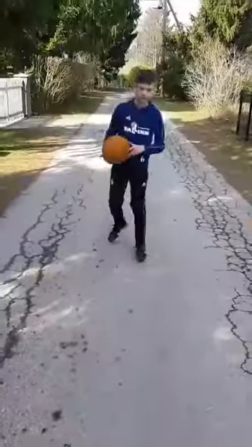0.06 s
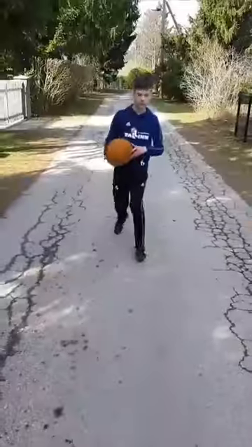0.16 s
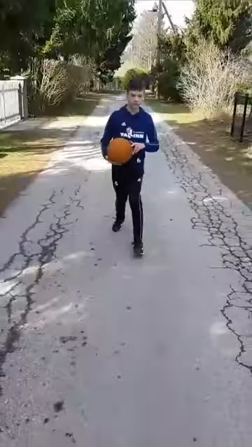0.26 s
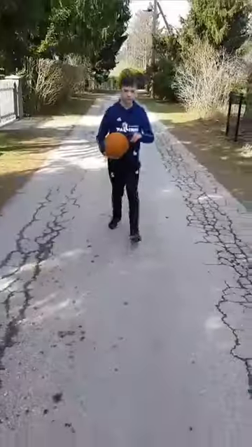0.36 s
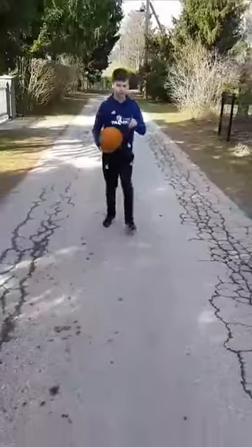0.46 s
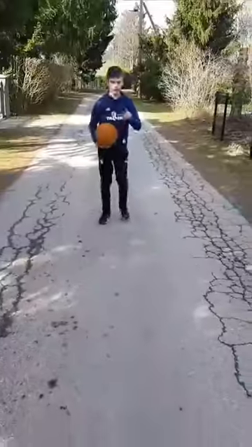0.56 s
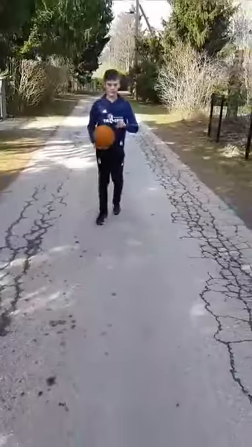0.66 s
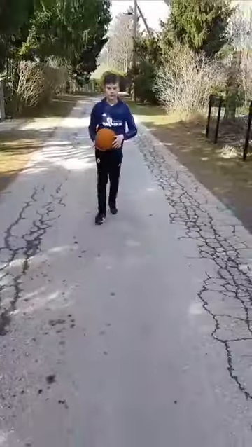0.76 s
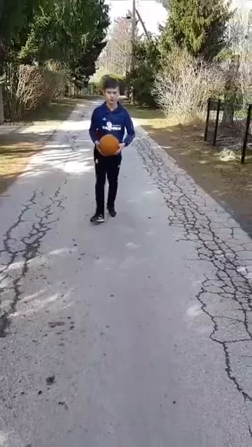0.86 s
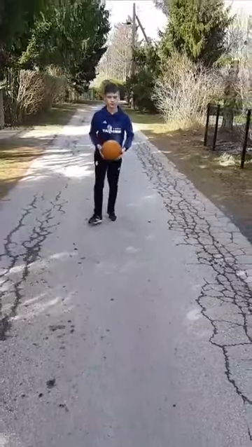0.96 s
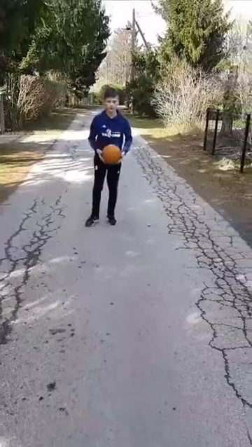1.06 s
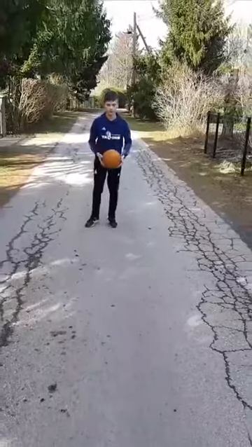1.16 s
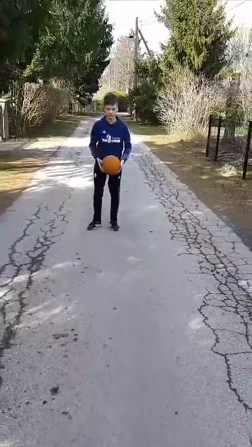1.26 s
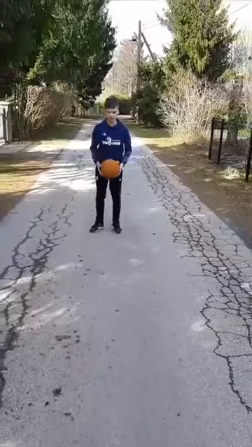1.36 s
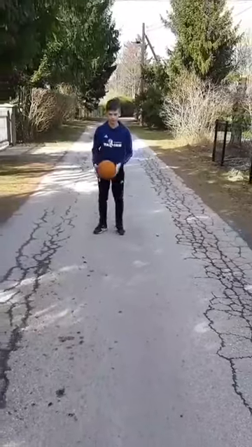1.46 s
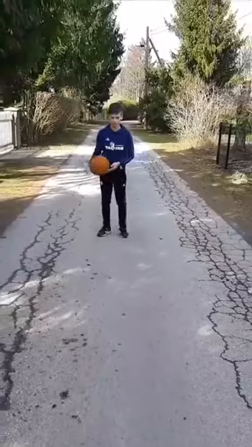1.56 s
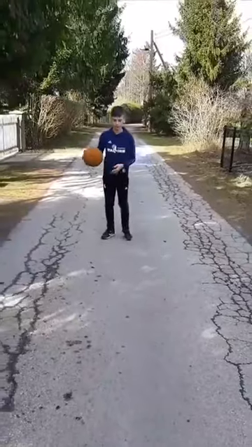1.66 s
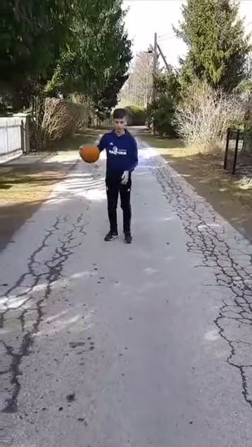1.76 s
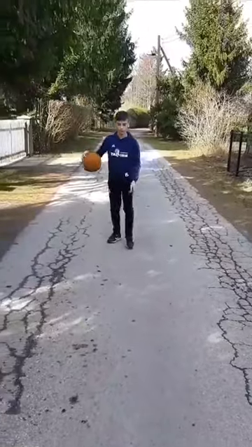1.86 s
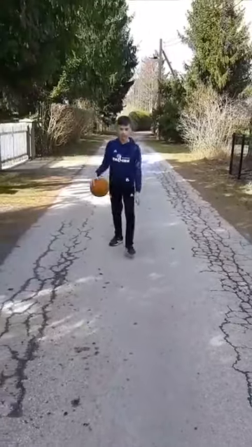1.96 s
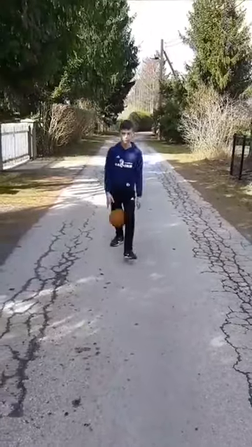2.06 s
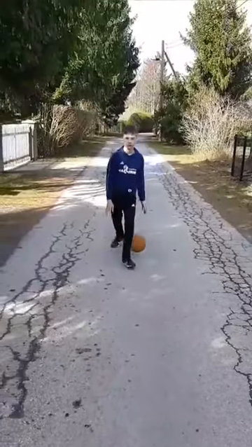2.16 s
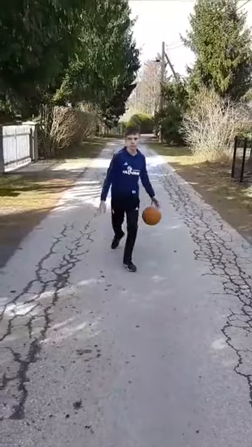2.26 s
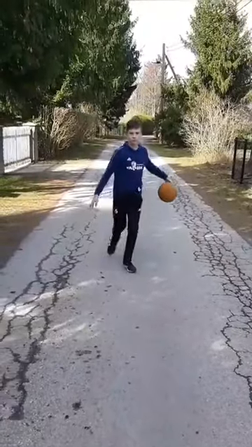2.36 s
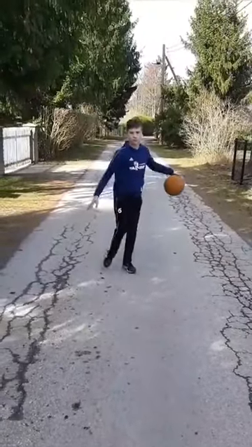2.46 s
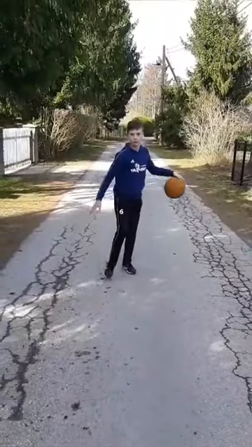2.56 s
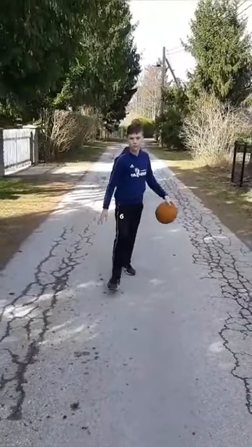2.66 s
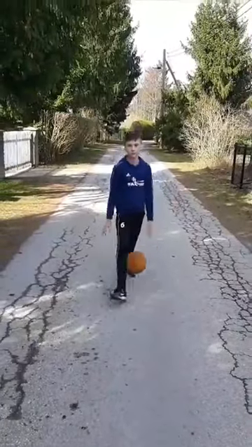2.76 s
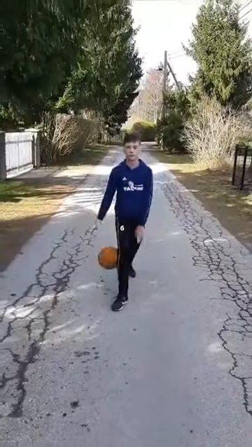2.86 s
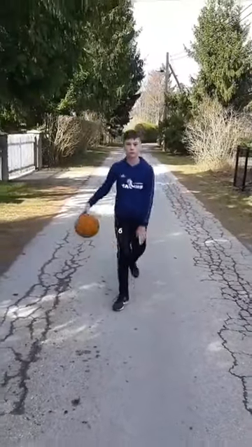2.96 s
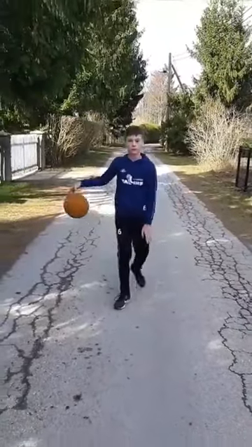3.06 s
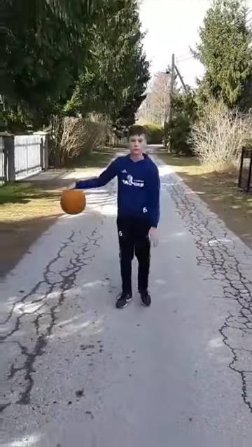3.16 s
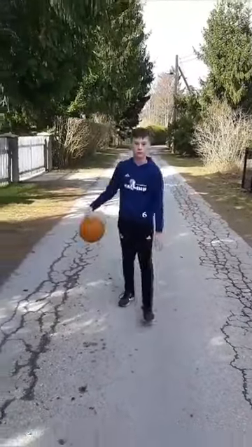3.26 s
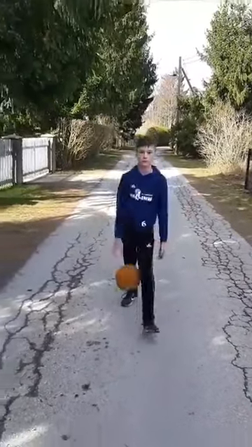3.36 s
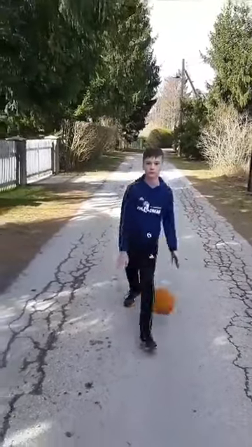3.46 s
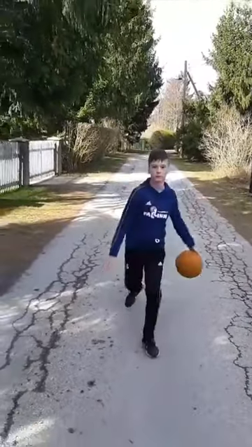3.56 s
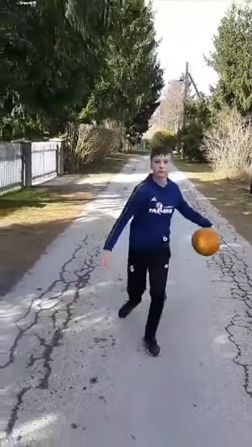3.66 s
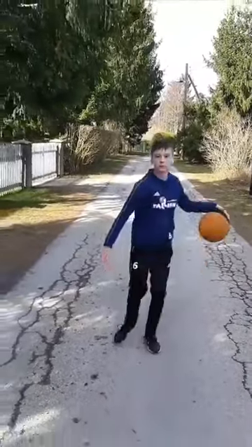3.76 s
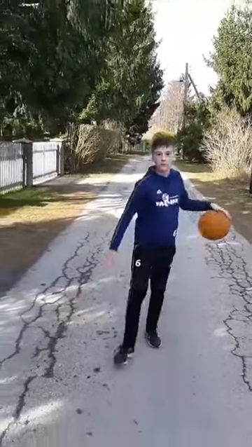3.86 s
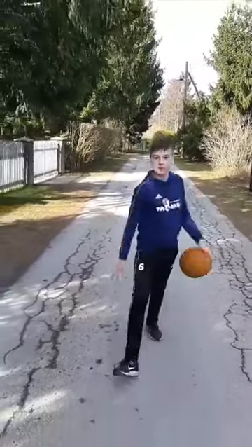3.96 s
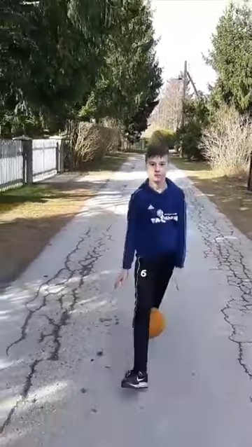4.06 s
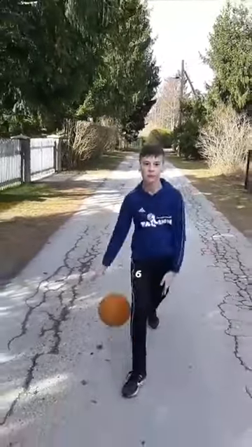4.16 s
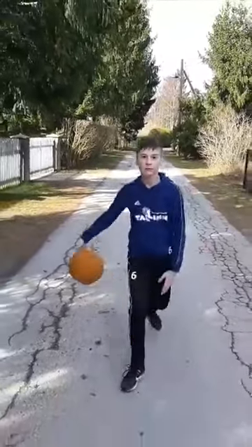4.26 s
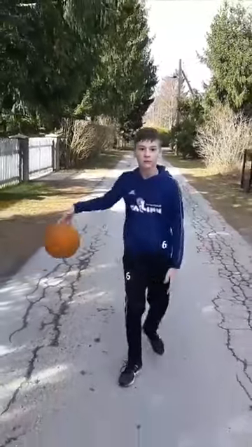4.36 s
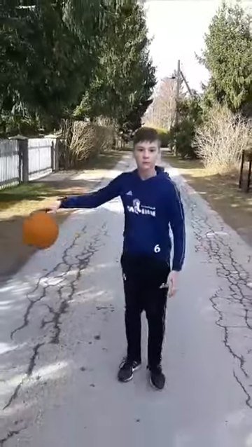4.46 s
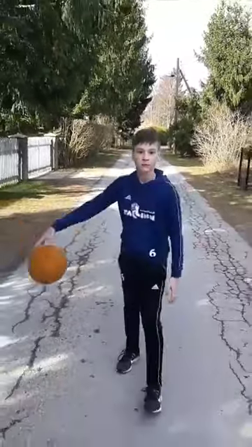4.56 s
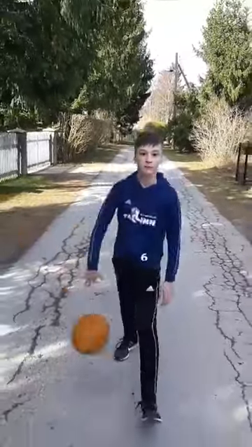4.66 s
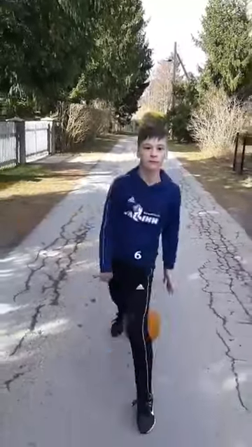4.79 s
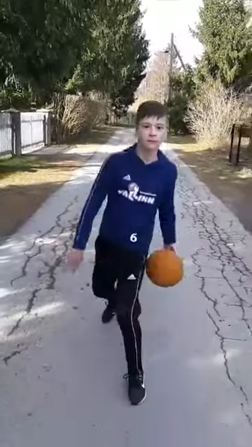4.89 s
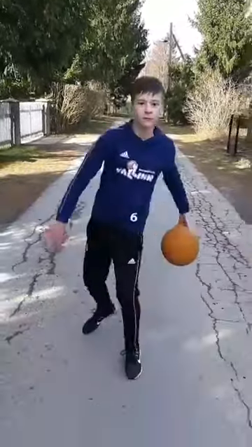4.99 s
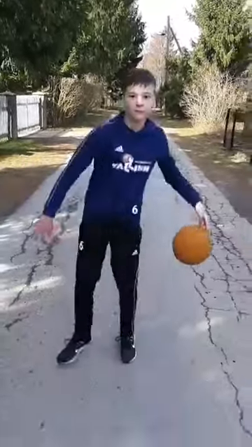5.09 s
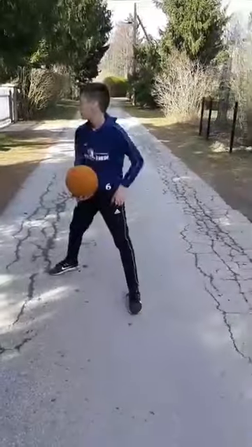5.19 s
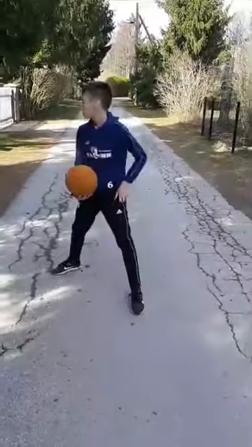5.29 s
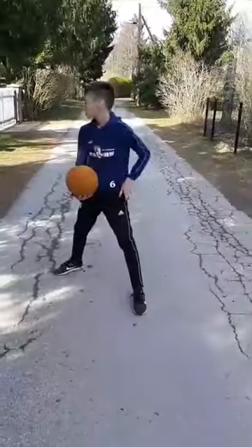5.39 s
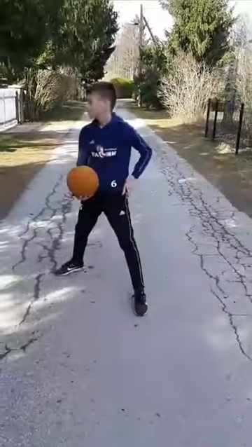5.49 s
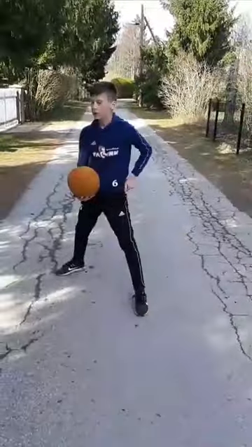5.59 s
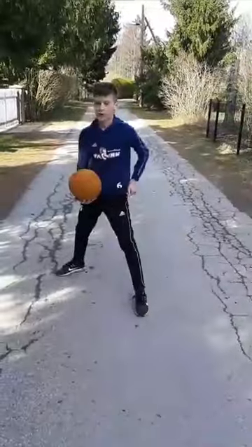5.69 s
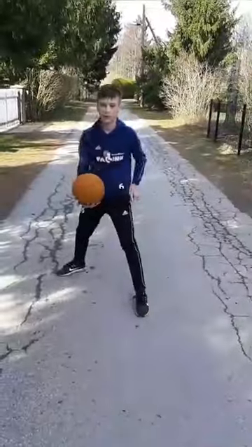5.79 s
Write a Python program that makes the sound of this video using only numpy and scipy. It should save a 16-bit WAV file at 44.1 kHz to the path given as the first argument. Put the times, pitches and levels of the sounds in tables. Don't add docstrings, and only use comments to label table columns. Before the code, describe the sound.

A quiet open-air lane with soft distant traffic, leaf hiss and low wind bumps on a handheld stereo microphone in the first second. Gritty shoe scuffs and tiny cracks come at about 0.2-0.4, 0.75 and 1.15 s. A songbird alternates a clean high falling note with a lower buzzy rising one until about 2.2 s, while thin whistles flicker above and a far fluting bird answers. A basketball hits asphalt softly and far off at 2.2 s, then hard at 2.9, moderately at 3.5, hard and duller at 4.15, and with a heavy thud at 4.8 s, each with short echoes and a diffuse tail. Foot taps and grit clicks fall between, clustering near 3.6 and 4.9 s. A distant crow caws long at 3.1, briefly at 4.6 and again at 5.2 s. The songbird returns around 3.7-4.3 s, then faintly. After 5 s no bounces follow; wind thumps and rumbles to the end.

```python
import sys
import numpy as np
from scipy import signal
from scipy.fft import rfft, irfft
from scipy.io import wavfile
from scipy.ndimage import uniform_filter1d

SR = 44100
rng = np.random.default_rng(int(sys.argv[2]) if len(sys.argv) > 2 else 0)


def ratio(d):
    e = np.asarray(d, float) / 20
    return 10 ** e


def transcribe(u):
    v = np.clip(np.atleast_2d(u).T, -1, 1)
    q = np.round(v * 32767).astype(np.int16)
    wavfile.write(sys.argv[1], SR, q)


N = 257103
TIME = np.arange(N) / SR


def rms_one(x):
    return x / np.sqrt(np.mean(x ** 2) + 1e-20)


def at_hz(points, hz):
    table = np.array(points)
    return np.interp(np.log(hz), np.log(np.maximum(table[:, 0], 1)), table[:, 1])


def band(x, low_hz, high_hz, order=2):
    edges_hz = [low_hz, min(high_hz, .45 * SR)]
    return signal.sosfilt(signal.butter(order, edges_hz, "band", fs=SR, output="sos"), x)


def ring(x, hz, t60):
    radius, angle = ratio(-60 / (t60 * SR)), 2 * np.pi * hz / SR
    return signal.lfilter([0, np.sin(angle)], [1, -2 * radius * np.cos(angle), radius ** 2], x + 1e-18)


def drift(rate):
    r = np.exp(-2 * np.pi * rate / SR)
    settled = signal.lfilter([1], [1, -2 * r, r * r], rng.standard_normal(N + SR))[SR:]
    return rms_one(settled)


def coloured(x, spectrum):
    hz = np.maximum(np.fft.rfftfreq(N, 1 / SR), 10)
    return rms_one(irfft(rfft(x) * ratio(at_hz(spectrum, hz)), N))


def ports(x, pan_db, lag=4.42):
    low = signal.lfilter(*signal.butter(1, 700, fs=SR), x)
    high = x - low
    late = np.interp(np.arange(len(x)) - lag, np.arange(len(x)), high, left=0)
    return np.array([low + late * ratio(pan_db / 2), low + high * ratio(-pan_db / 2)])


def add(out, x, s):
    i = round(s * SR)
    out[..., i:i + x.shape[-1]] += x[..., :N - i]


def strokes(rows, attack_s, fade_db_per_s):
    s, hold, db = np.transpose(rows)[:3, :, None]
    since = TIME - s
    rise = np.clip(since / attack_s, 0, 1) ** 2
    return since, rise * ratio(db - fade_db_per_s * np.maximum(since - attack_s - hold, 0))


def among_trees(x, wet_db, t60):
    t = np.arange(SR) / SR
    tail = rng.standard_normal((2, SR)) * ratio(-60 * t / t60) * np.minimum(t / 0.01, 1)
    wet = signal.fftconvolve(x[None], tail / np.sqrt(np.sum(tail[0] ** 2)), axes=1)[:, :N]
    return ports(x, -12.0) + ratio(wet_db) * wet


def air():
    # frequency_hz, density_db (per Hz)
    air_spectrum = [(15, -36.5), (25, -2), (123, 0.5), (270, -12), (575, -10), (796, -13.5), (887, -12.5),
                    (1130, -17.5), (2000, -23), (3920, -18.5), (5430, -22.5), (6560, -20), (8590, -27.5),
                    (14800, -24), (16000, -46)]
    # time_s, level_db
    background = [(0.0, -72.5), (0.32, -70), (1.6, -73), (2.34, -72.5), (2.76, -73.5), (3.05, -54), (3.31, -74),
                  (3.7, -69), (4.0, -74.5), (4.58, -74), (5.0, -71), (5.5, -64.5)]
    # frequency_hz, likeness (1 = the same)
    likeness = [(60, 0.4), (180, 0.99), (550, 0.74), (1650, 0.52), (4970, -0.45), (15000, -0.096)]
    hz = np.maximum(np.fft.rfftfreq(N, 1 / SR), 10)
    alike = np.clip(at_hz(likeness, hz), 0, 1)
    mid, side = rfft(rng.standard_normal((2, N))) * ratio(at_hz(air_spectrum, hz))
    both = np.sqrt(1 + alike) * mid + np.sqrt(1 - alike) * side * [[1], [-1]]
    dull = irfft(both / (1 + (hz / 2500) ** 4), N)
    hiss = irfft(both / (1 + (2500 / hz) ** 4), N)
    hiss = hiss + band(hiss, 2000, 4200) * (ratio(2 * drift(6.5)) - 1)
    background_db = np.minimum(np.interp(TIME, *np.transpose(background)), -68)
    hiss_db = -79 + 0.25 * (background_db + 64.5)
    dull = dull * ratio(background_db) / np.std(band(dull, 330, 850))
    return dull + hiss * ratio(hiss_db) / np.std(band(hiss, 9300, 13000))


def wind():
    # start_s, hold_s, level_db, pan_db
    gusts = [(0.021, 0.058, -56, 6.5), (0.129, 0.018, -45, -8.5), (0.224, 0.045, -66, 2),
             (0.363, .1, -63.5, -10), (0.61, 0.026, -67, -8), (0.694, 0.016, -58, 2),
             (0.944, 0.015, -68.5, -6), (1.2, 0.27, -70.5, 1), (1.584, .03, -82, 5), (1.75, 0.26, -71, -5),
             (4.983, 0.17, -64, 11), (5.178, 0.067, -53.5, -1), (5.293, 0.16, -59, 11),
             (5.503, .08, -45.5, -6), (5.628, 0.03, -41, -8.5), (5.765, 0.01, -50, -5)]
    # start_s, peak_db, pitch_hz, pan_db
    knocks = [(0.143, -46, 86, -27), (0.173, -65, 100, -13), (5.293, -32.5, 104.1, 30),
              (5.346, -42.5, 78.9, 32), (5.505, -36.5, 86, -34.5), (5.642, -48, 184, 18),
              (5.653, -38, 185, -18), (5.712, -36, 106, -43), (5.807, -44, 96, -15)]
    gains = strokes(gusts, attack_s=0.037, fade_db_per_s=158)[1]
    pan_db = np.clip(np.transpose(gusts)[3], -20, 20)
    lumps = np.array([rms_one(band(rng.standard_normal(N) * ratio(4.9 * drift(26)), 25, 134.0)) for side in "LR"])
    out = ratio(pan_db * [[.5], [-.5]]) @ gains * lumps
    t = np.arange(3000) / SR
    push = np.where(t < .004, np.sin(np.pi * t / .004), 0)
    for s, peak_db, hz, side_db in knocks:
        knock = ring(push, hz * 1.52, 0.014)
        level_db = peak_db + 11.5 + np.minimum([[side_db], [-side_db]], 0)
        add(out, ratio(level_db) * knock / np.abs(knock).max(), s)
    return out


def crow():
    # start_s, hold_s, level_db, pitch_hz, beak_db (upper band re all, at the start)
    caws = [
        (3.088, 0.36, -60, 333.4, -19.5),
        (4.608, 0.016, -61.5, 302.6, -12),
        (5.176, 0.14, -57.5, 325, -18),
    ]
    # frequency_hz, width_hz, level_db
    throat = [(1398, 920, 2), (1561, 940, 9.5), (1860, 630, 10.5), (2270, 540, 9.5)]
    hoarseness = np.array([1.5, 1.2, .8])
    since, gains = strokes(caws, attack_s=0.014, fade_db_per_s=916)
    caw = gains.argmax(axis=0)
    since = np.clip(np.choose(caw, since), 0, .5)
    hoarse = np.array(hoarseness)[caw]
    sag_hz_per_s, beak_db_per_s = 87, 19
    hz, open_db = np.transpose(caws)[3:, caw] + since * [[-sag_hz_per_s], [beak_db_per_s]]
    hz = hz * (1 - 0.1 * np.exp(-since / 0.016))
    phase = np.cumsum(hz * (1 + .013 * hoarse * drift(70))) / SR % 1
    pulses = rms_one(np.diff(phase, prepend=0) < 0) * ratio(2.0 * drift(156.5))
    source = pulses + hoarse * rng.standard_normal(N) * (phase < .4)
    voice = 0
    for k, (f, width, peak_db) in enumerate(throat):
        gain = ratio(peak_db + (open_db + 8.5) * (k - 3.5) * 0.67)
        voice = voice + gain * ring(source, f, 3.9 / width) * width / 250 * (-1) ** k
    voice = band(voice, 825, 2100, order=5) + 0.16 * band(source, 550, 1100)
    voice = voice / np.sqrt(uniform_filter1d(voice ** 2, size=4000))
    return among_trees(gains.sum(axis=0) * ratio(-1.0) * voice, wet_db=-2.0, t60=0.51)


def whistler(notes, wet_db, waver):
    attack_s = .015
    gain = strokes(notes, attack_s, fade_db_per_s=393)[1].sum(axis=0)
    s, hold, _, start, end = np.transpose(notes)
    hz = np.interp(TIME, np.ravel([s, s + attack_s + hold], "F"), np.ravel([start, end], "F"))
    phase = 2 * np.pi * np.cumsum(hz * (1 + waver * drift(120))) / SR
    return among_trees(gain * ratio(6.0 + 3.3 * drift(30)) * np.sin(phase), wet_db, t60=0.85)


def whistling_birds():
    # start_s, hold_s, level_db, from_hz, to_hz
    whistles = [(0.02, 0.033, -87, 7140, 7250), (0.14, 0.042, -80, 7160, 6830),
                (0.425, 0.062, -78, 7280, 7400), (0.86, 0.051, -77.5, 6700, 6670),
                (1.055, 0.039, -82, 7300, 7300), (1.315, 0.016, -76.5, 7200, 6800),
                (1.56, 0.077, -80, 6800, 7300), (1.65, 0.094, -78, 7270, 7090),
                (1.865, 0.058, -79.5, 7760, 7470)]
    # start_s, hold_s, level_db, from_hz, to_hz
    warble = [(1.42, 0.056, -67.5, 6200, 6350)]
    # start_s, hold_s, level_db, from_hz, to_hz
    flutes = [(0.94, 0.13, -83.5, 1800, 1700), (2.105, 0.13, -77.5, 1900, 1960),
              (2.36, 0.077, -77, 1983, 2130), (2.45, 0.11, -92, 2180, 2140),
              (2.63, 0.045, -83.5, 1890, 2020), (2.69, 0.047, -82, 2010, 1896),
              (3.965, 0.089, -80.5, 1727, 1650)]
    high = whistler(whistles, wet_db=1.5, waver=0.0033)
    near = whistler(warble, wet_db=-10.0, waver=0.0027)
    return high + near + whistler(flutes, wet_db=2.5, waver=.02)


def songbird():
    # start_s, peak_db, pitch_hz
    high_notes = [(0.0044, -66.5, 4260), (0.281, -50, 4370), (0.698, -53, 4340), (1.1217, -51, 4374),
                  (1.5409, -48, 4340), (1.9664, -49, 4315), (3.655, -56, 4315), (4.084, -50, 4300),
                  (5.2684, -66, 4460), (5.3133, -69.5, 4445)]
    # start_s, peak_db, pitch_hz
    low_notes = [(0.0323, -65.5, 3710), (0.4544, -57, 3710), (0.8774, -61, 3730), (1.2894, -62.5, 3623),
                 (1.7135, -62, 3650), (2.155, -61.5, 3700), (2.3, -71.5, 3625), (3.8342, -60.5, 3700),
                 (4.2702, -62, 3654), (5.4495, -66.5, 3638)]
    out, t = np.zeros(N), np.arange(round(.12 * SR)) / SR
    for notes, length, fall, glide, buzz in ((high_notes, .065, .04, .02, 0), (low_notes, .1, -.05, .014, 1.0)):
        shape = np.clip(np.minimum(t / 0.0099, (length - t) / 0.064), 0, 1)
        for s, db, hz in notes:
            unsteady = 0.0019 * np.interp(t, t[::200], rng.standard_normal(27))
            pitch = hz * (1 + fall * (np.exp(-t / glide) - .15) + unsteady)
            wander = 5 * np.cumsum(rng.standard_normal(len(t))) / np.sqrt(len(t))
            tremolo = np.sin(2 * np.pi * 235 * rng.normal(1, 0.04) * t + wander)
            phase = 2 * np.pi * np.cumsum(pitch) / SR + buzz * np.exp(-t / 0.24) * tremolo
            add(out, ratio(db + 1.5) * shape * np.sin(phase), s)
    return among_trees(out * ratio(1.8 * drift(15)), wet_db=2.0, t60=0.58)


def scuffs():
    # start_s, hold_s, bright_db, dull_db (re bright)
    drags = [(0.219, 0.013, -59, -15), (0.3, 0.0073, -70.5, 5.5), (0.722, 0.005, -67, -4),
             (1.146, 0.021, -60.5, -0.5), (3.55, 0.0094, -68.5, 15), (3.643, 0.029, -71, 16.5),
             (3.914, 0.21, -80, 8), (4.101, 0.012, -65, 16.5), (4.467, 0.023, -83.5, 13),
             (4.639, 0.13, -82.5, 14), (4.839, 0.014, -63.5, 8), (4.91, 0.0082, -92.5, 27),
             (5.11, 0.0066, -80.5, 4)]
    # frequency_hz, density_db (per Hz)
    grit_spectrum = [(700, -10), (2200, -10.5), (3200, -10), (4860, -18), (6390, -8), (7250, -13),
                     (10400, -28), (16000, -32)]
    # frequency_hz, density_db (per Hz)
    sole_spectrum = [(150, -32.5), (350, 6.5), (1000, -1.5), (2300, 6), (3300, -46.5), (6000, -34.5)]
    gains = strokes(drags, attack_s=0.037, fade_db_per_s=227.5)[1]
    bright, dull = gains.sum(axis=0), ratio(np.transpose(drags)[3]) @ gains
    sizes = ratio(3 * np.minimum(rng.exponential(1, (3, N)), 4))
    grains = rng.standard_normal((3, N)) * sizes * (rng.random((3, N)) < .08)
    dealt, sole = rng.integers(0, 10, N), grains[0]
    stones_hz = np.geomspace(900, 12000, 10)
    grains = sum(np.sqrt(hz) * hz * ring(grains * (dealt == k), hz, 9 / hz) for k, hz in enumerate(stones_hz))
    sides = []
    for g in grains[1:]:
        crunch = rms_one(band(ring(g, 4300 + 900 * drift(0.98)[0], 0.0028), 3700, 12000))
        sides.append(coloured(grains[0] + 2.4 * g, grit_spectrum) + .5 * crunch * ratio(7.0 * drift(3.4)))
    grit = np.array(sides) * ratio([[-2.5], [2.5]])
    rub = ports(coloured(sole * ratio(2.9 * drift(60)), sole_spectrum), -15.0)
    return ratio(2.0 * drift(70)) * (bright * ratio(12.0) * grit + dull * ratio(-1.0) * rub)


def taps():
    # start_s, peak_db, pitch_hz, pan_db, t60_s
    heels_and_palms = [(2.359, -47.5, 560, -5, 0.084), (2.774, -62, 496, -1, 0.026),
                       (3.001, -42.5, 690, -11, 0.012), (3.012, -45.5, 560, 16, 0.048),
                       (3.595, -39, 388, -7, 0.059), (3.603, -41.5, 476, 7, 0.024),
                       (3.6108, -33.5, 523, 6, 0.044), (3.726, -54, 580, 28, 0.025),
                       (3.923, -52.5, 546, 9, 0.031), (4.312, -52, 400, -12, 0.039),
                       (4.112, -46, 290, -14, .02), (3.921, -60.5, 372, 1.5, 0.014),
                       (4.764, -53.5, 498, -7, 0.055), (4.867, -45, 490, 12, 0.056),
                       (4.915, -37, 418, -6, 0.18), (4.936, -32, 607, -6, 0.028),
                       (4.946, -36, 564, -6, 0.029), (5.105, -55.5, 860, -2.5, 0.036),
                       (2.187, -49.5, 660, -4, 0.062), (3.182, -51, 318, -12, 0.024),
                       (4.113, -42.5, 680, 12, 0.015), (4.129, -67.5, 510, 1, 0.024)]
    # start_s, peak_db, pitch_hz, pan_db, t60_s
    cracks = [(0.175, -57, 3710, -11, 0.017), (0.2425, -60, 4200, -12, 0.03),
              (0.261, -45, 2730, -18, 0.026), (0.34, -40, 3860, -9, 0.011), (0.757, -68, 4000, 3, 0.012),
              (2.763, -59, 1900, -11, 0.071), (5.104, -68, 2477, 3, 0.01), (2.2082, -33.5, 6000, -8, 0.017),
              (3.4817, -39, 4600, -1, 0.018), (2.856, -52, 2600, -27, .03), (3.5867, -47, 2100, -2, 0.015),
              (3.6683, -40.5, 2370, -7, 0.012), (3.668, -39.5, 4360, -2, 0.0059),
              (4.129, -42.5, 2200, -8, 0.017), (4.781, -33, 5600, -20, .02), (0.355, -50, 2320, -3, 0.016),
              (3.722, -46, 2130, -10, 0.054), (3.687, -38, 3940, -9, 0.011),
              (3.9513, -65, 1900, -13, 0.021), (3.9717, -62, 1930, -23, 0.015),
              (4.059, -43, 4590, -12.5, 0.0068), (4.474, -64, 6540, -25.5, 0.017),
              (4.4867, -57.5, 6300, -34, 0.023), (4.6763, -72, 2190, -14, 0.024),
              (2.188, -52, 3900, -16, 0.019), (2.839, -38.5, 6350, -25, 0.042),
              (2.8402, -40.5, 2720, -10, 0.033), (0.2483, -49, 6300, -13, 0.016),
              (0.3286, -46, 4900, -8, 0.01), (1.1785, -42, 4600, 1, .012), (1.19, -37, 5100, -9, 0.0092),
              (0.7545, -52, 4420, -5, .012), (2.842, -22.5, 4700, -10.5, 0.0049),
              (4.108, -50, 2550, 14, 0.0086), (4.139, -32, 4500, -13, .02), (4.142, -32.5, 2097, -8, 0.023),
              (4.783, -25, 6170, -24, 0.026), (4.794, -27, 5960, -14, 0.0075)]
    out, t = np.zeros((2, N)), np.arange(3000) / SR
    for s, db, hz, pan_db, t60 in heels_and_palms + cracks:
        spatter = rng.standard_normal(len(t)) * ratio(-60 * t / t60) * np.minimum(t * hz, 1)
        burst = spatter + 0.81 * np.sqrt(SR / hz) * (t == 0)
        tick = band(burst, hz / 1.35, min(hz * 1.3, 7200), order=3) + 0.1 * band(burst, 1900, 4600)
        add(out, ports(ratio(db) * tick / np.abs(tick).max(), pan_db), s)
    return out


def ball_slap(t, slap_db, bright_db, pitch, wall_db, low_db):
    # frequency_hz, level_db, t60_s
    shell_modes = [(576, -14, 0.07), (696, -12, 0.061), (855, -6.5, 0.019), (1192, -14, 0.06),
                   (1540, 5.5, 0.013), (1514, -29, 0.36), (1700, -7, 0.017), (1950, 6, 0.0081),
                   (2350, -5.5, 0.0081), (2500, -21.5, .01), (2770, -36.5, 0.18)]
    # frequency_hz, level_db, t60_s
    skin_modes = [(4100, 0, .004), (4900, -3, .0028), (5700, -4, .0028), (6400, -5, .0028),
                  (7100, -11, .003)]
    click = -1. * (t == 0)
    spatter = click + .3 * rng.standard_normal(len(t)) * np.exp(-(t / .0006) ** 2)
    wall = skin = 0
    for hz, db, t60 in shell_modes:
        gain = ratio(db + wall_db + low_db * (hz < 1000) + rng.normal(0, 1.5))
        wall = wall + gain * ring(click, hz * (pitch if hz > 1000 else 1) * rng.normal(1, .02), t60)
    for hz, db, t60 in skin_modes:
        gain = ratio(db * (1 - min(bright_db, 0) / 9) + rng.normal(0, 1.5))
        skin = skin + gain * ring(spatter, hz * rng.normal(1, .02), t60)
    pop_s = 0.000099
    pop = -ratio(-2.5 + wall_db / 2) * np.exp(-(t / pop_s - 1.5) ** 2)
    bright = ratio(bright_db + 13.0) * band(skin, 4100, 7000, order=4)
    return ratio(slap_db - 10.5) * band(band(pop + wall, 6.7, 4200, order=1) + bright, 120, 7000, order=5)


def ball_thud(t, peak_db):
    thud_hz, squash_s, t60_s, rebound_s = 165, .008, .0082, .00175
    squash = (1 - np.exp(-(t / squash_s) ** 2)) * ratio(-60 * t / t60_s)
    thud = band(squash * np.sin(2 * np.pi * thud_hz * (t - rebound_s)), 75, 4500)
    return ratio(peak_db + 1.5) * thud / np.abs(thud).max()


def lane_echoes(out, slap, thud, far_db, fence_ms, fence_db, house_ms):
    # delay_s, level_db, top_hz, bottom_hz, side (pan factor)
    reflectors = [(.0068, -12, 1091, 262, -0.039), (.014, -18, 3000, 675, -0.35),
                  (.021, -19, 2447, 99.7, -1.5), (.032, -27, 1965, 81, 0.24), (.071, -24, 438, 60, 1),
                  (.092, -40.5, 600, 60.7, 1), (.145, -36, 900, 188, -0.24)]
    for delay, db, top_hz, bottom_hz, echo_side in reflectors:
        smear = rng.standard_normal(400) * np.hanning(400) ** 2 * 0.15 + 0.57 * (np.arange(400) == 100)
        slap_gain = ratio(fence_db * (.01 < delay < .018) - 2.2 * (delay < .01))
        echo = slap_gain * signal.fftconvolve(slap[:4000], smear)[:4000] + 0.64 * np.roll(thud[:4000], 100)
        echo = band(echo, bottom_hz, top_hz, order=1)
        later_ms = house_ms if delay > .05 else fence_ms * (delay > .01)
        i = round((delay + later_ms / 1000) * SR) - 100
        out[:, i:i + len(echo)] += ratio(db + far_db) * ports(echo, 3 * echo_side - 2.5)


def hedge_scatter(t, level_db):
    # frequency_hz, level_db, t60_s
    scatter_bands = [(103, -31.5, 0.15), (196, -20.5, 0.14), (415, -29, 0.09), (790, -33, 0.13),
                     (1570, -28, 0.19), (3000, -26, 0.11), (4940, -28.5, 0.11), (7800, -43, 0.12),
                     (11600, -44, 0.13)]
    out = np.zeros((2, len(t)))
    knots = np.arange(0, .5, 0.004)
    shared = rng.standard_normal(500)[:len(knots)]
    for hz, db, t60 in scatter_bands:
        uneven = 2.1 * shared + 0.99 * rng.standard_normal(500)[:len(knots)]
        lumps = ratio(0.5 * np.interp(t, knots, uneven) * np.clip(hz / 600, 0, 1))
        mid, side = band(rng.standard_normal((2, len(t))), hz / 1.37, hz * 1.24)
        apart = np.clip(0.18 * np.log2(hz / 100), 0, 1)
        decay = ratio(-60 * t / t60) + ratio(-15.0 - 60 * t / (4.66 * t60))
        swell = (1 - np.exp(-(t / 0.0043) ** 2)) * decay
        out += ratio(db + level_db) * swell * lumps * rms_one(mid + apart * side * [[1], [-1]])
    return out


def bounce(slap_db, thud_db, bright_db, far_db, fence_ms, fence_db, house_ms, pitch, wall_db, low_db):
    t = np.arange(SR // 2) / SR
    slap = ball_slap(t, slap_db, bright_db, pitch, wall_db, low_db)
    thud = ball_thud(t, slap_db + thud_db)
    out = ports(slap + thud, -14.0)
    lane_echoes(out, slap, thud, far_db, fence_ms, fence_db, house_ms)
    return out + hedge_scatter(t, slap_db + thud_db + 0.41 * far_db)


def ball():
    # start_s, slap_db, thud_db (re slap), bright_db (re slap), echoes_db (stronger far from the microphone)
    blows = [
        (2.2105, -22, 4.5, -5, 13),
        (2.8623, -7, -1.5, -12.5, 2.5),
        (3.4871, -13.5, 1, -3.5, 5),
        (4.1549, -7, -0.5, -28.5, -1.5),
        (4.7854, -10.5, 4, -8.5, 0),
    ]
    # fence_later_ms, fence_db, houses_later_ms
    lane = [(-1.5, 3, -1.5), (-.6, 7, -2), (1, -6, 2.5), (.2, 7, 1), (1.5, 11, 8)]
    # pitch_share, level_db, low_modes_db (more)
    struck = [(.95, -2.5, 11), (1.1, 0, 1.6), (1.3, 1.5, -4.5), (1.03, -1, 3.5), (.85, -3, 6.5)]
    out = np.zeros((2, N))
    for k, (s, *blow) in enumerate(blows):
        add(out, bounce(*blow, *lane[k], *struck[k]), s)
    return out


def scene():
    birds = songbird() + whistling_birds() + crow()
    return ball() + taps() + scuffs() + birds + wind() + air()


def top_cut(x):
    return signal.sosfilt(signal.butter(12, 15850, fs=SR, output="sos"), x)


def record(dry):
    x = signal.sosfilt(signal.butter(3, 55, "high", fs=SR, output="sos"), dry)
    notch_hz, width_hz, share = 3308, 490, 0.42
    x = x - share * signal.lfilter(*signal.iirpeak(notch_hz, notch_hz / width_hz, fs=SR), x)
    return top_cut(np.clip(x, -.95, .95))


dry = scene()
out = record(dry)
transcribe(out)
```